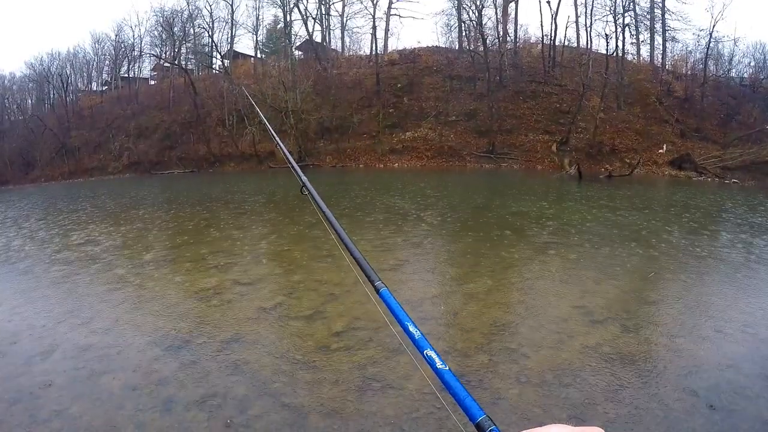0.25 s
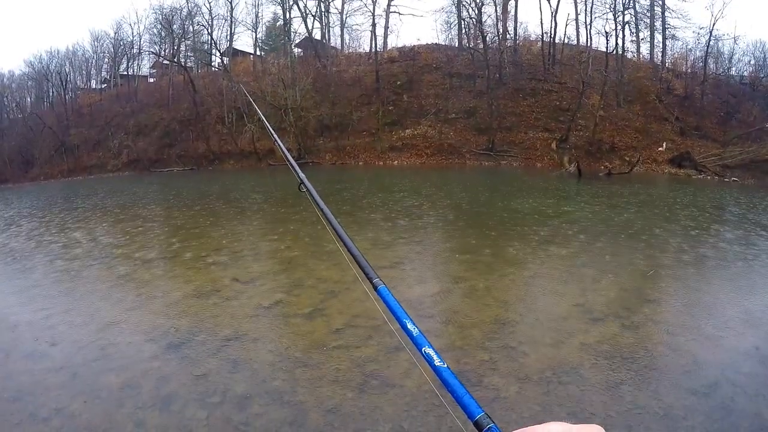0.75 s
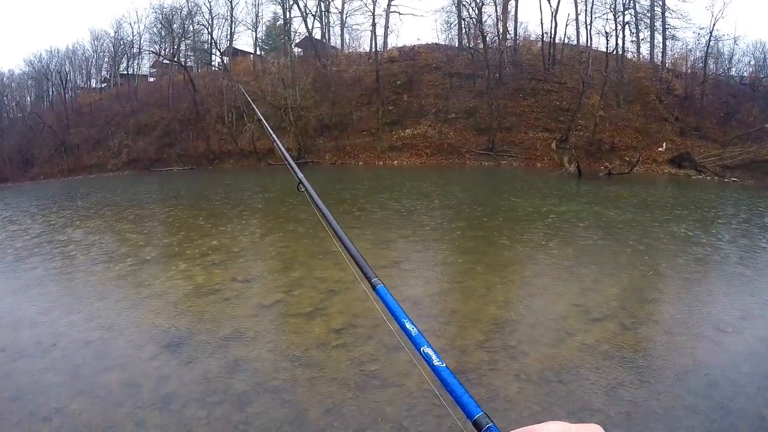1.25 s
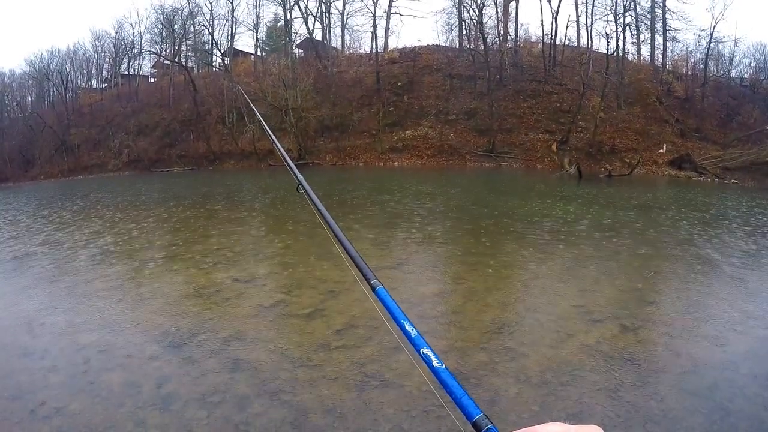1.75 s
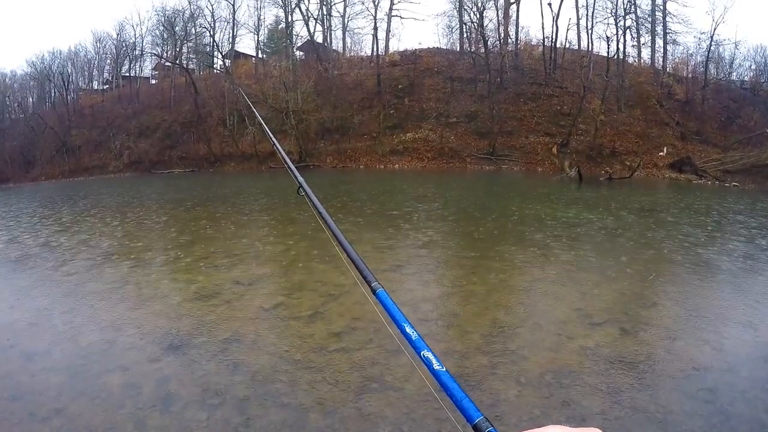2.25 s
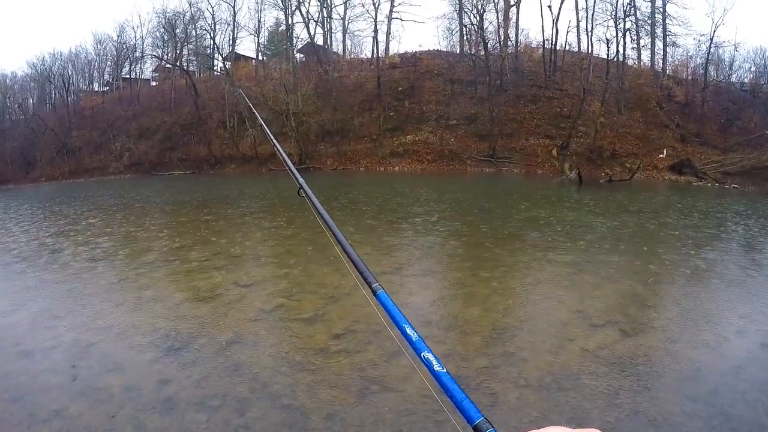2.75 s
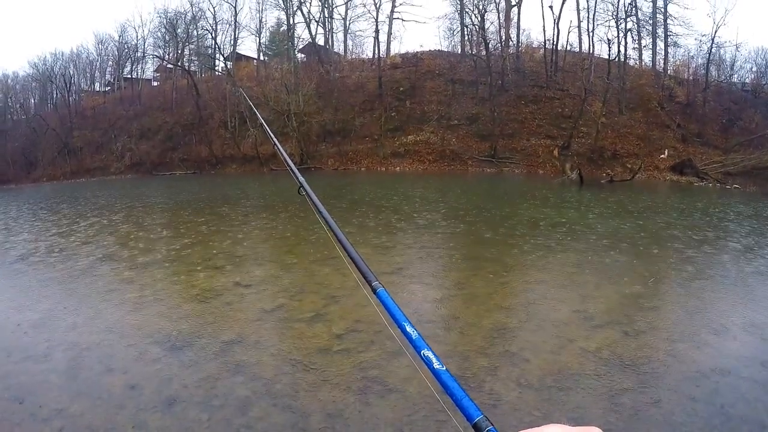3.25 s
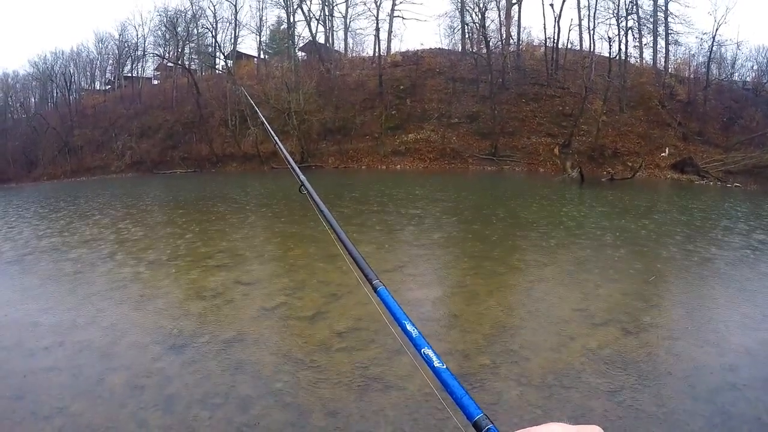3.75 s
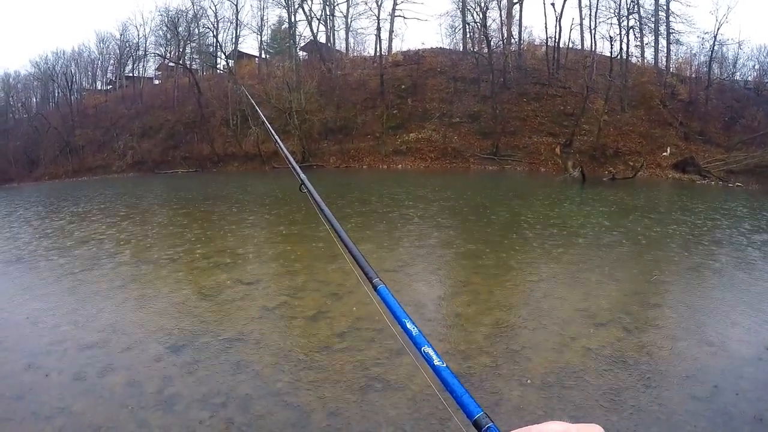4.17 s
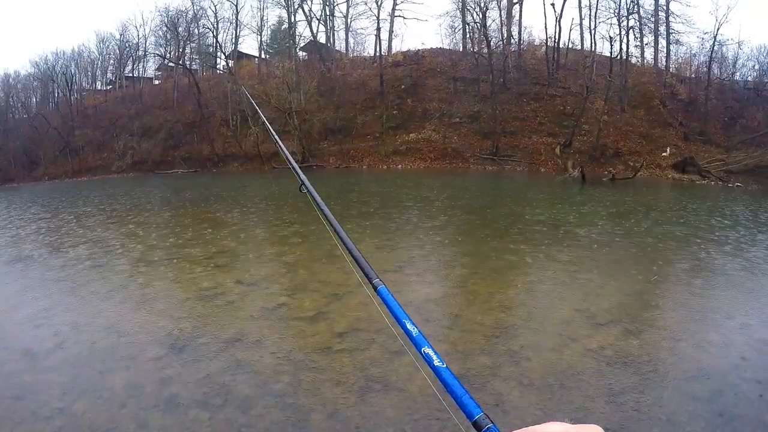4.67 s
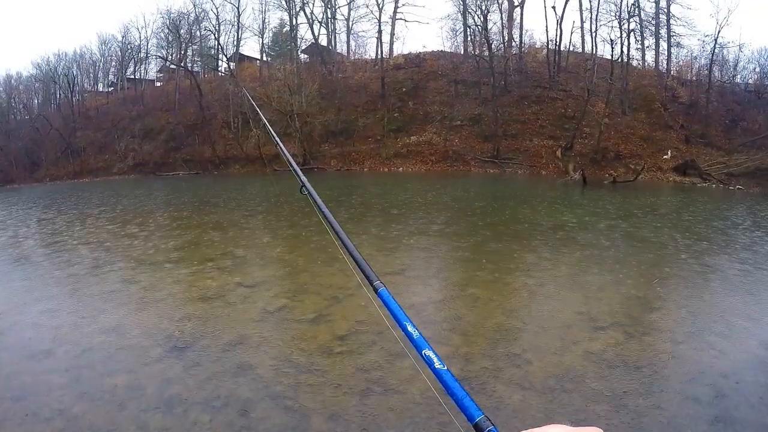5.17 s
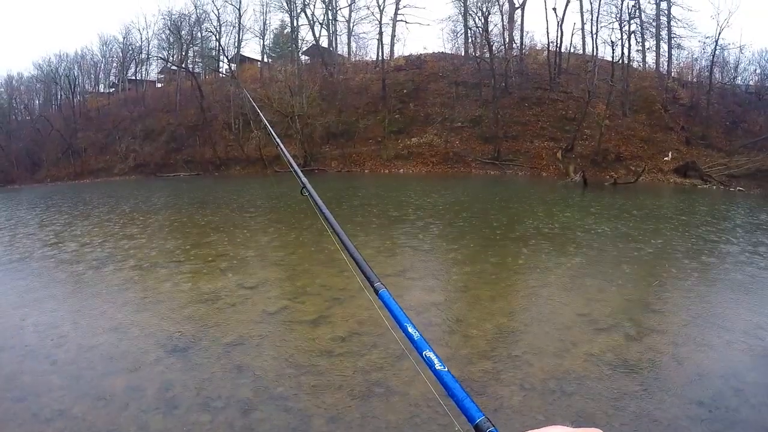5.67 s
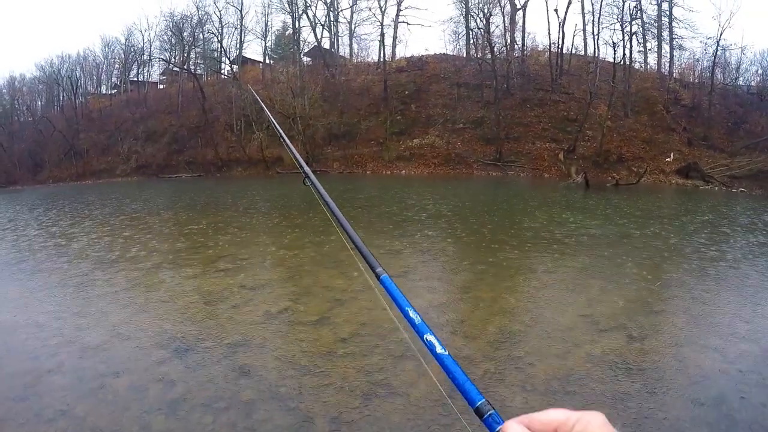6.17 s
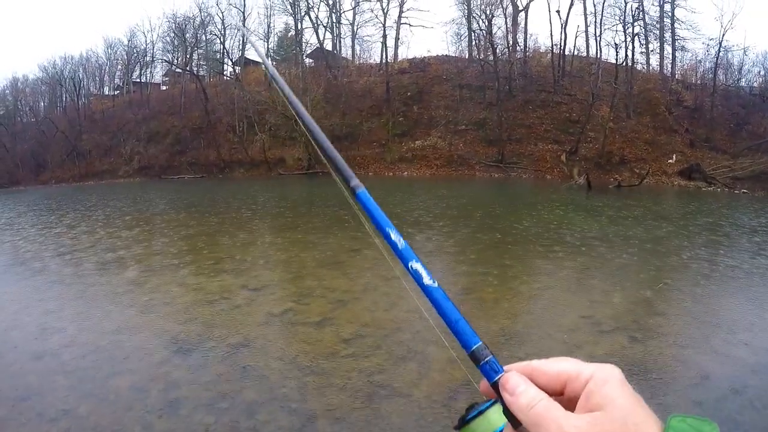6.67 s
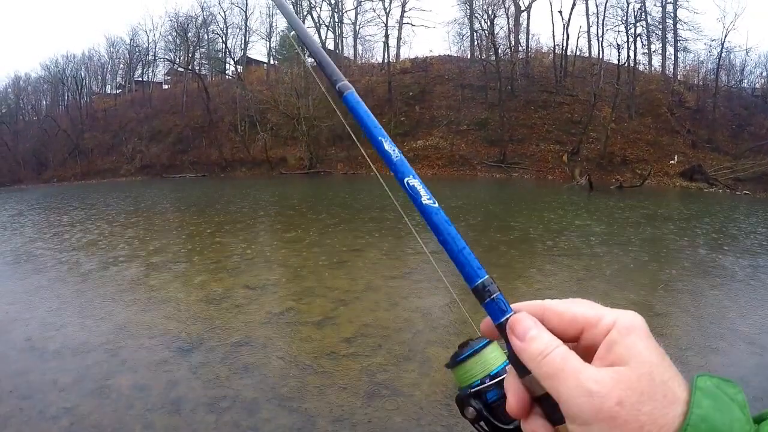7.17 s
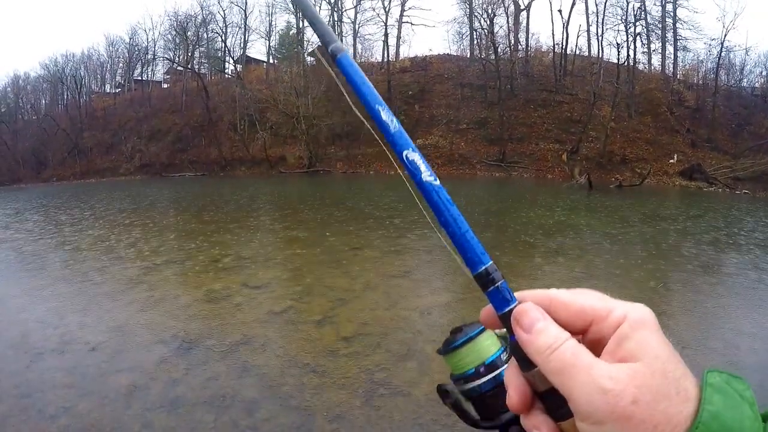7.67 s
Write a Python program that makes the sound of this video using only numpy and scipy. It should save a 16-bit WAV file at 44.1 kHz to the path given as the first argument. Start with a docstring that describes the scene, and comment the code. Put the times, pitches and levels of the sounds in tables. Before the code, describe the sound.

Steady rain falls on a river for about eight seconds, a quiet, even, finely grained hiss with a slightly hollow plastic colour, over a low, uneven rumble of light breeze. Fine spray patters faintly and tiny bubbles plip on the water, a clearer one at 0.1. Drops hit the microphone's case as very short, dry, ringing taps: a moderate one at 0.3, weaker ones at 0.6, 1.0 and 1.7, then a very loud crack at 1.8. After a calmer stretch come firm taps at 3.4 and 3.75, then a cluster from 4.1 to 4.5, with the hardest at 4.2. Clear plips sound at 3.1 and between 5.4 and 5.7; further taps at 5.8 and 6.1. A dull bump at 6.5 has softer knocks after it. The sharpest tap snaps at 6.9, the hiss dips and creeps back, a soft low bump follows at 7.3, and a final tap lands at 7.9.

```python
"""A river bank in steady rain, heard from a small camera worn by an angler.
The rain on the river is filtered noise: an even hiss with fine grains, coloured by the plastic case.
Drops tap the case and make its many pitches ring, with a faint shiver after the full drops.
Bubbles on the water close by plip as short rising tones, and lifting the rod bumps the camera softly.
Moving air adds a low, uneven rumble of filtered noise."""
import sys
import numpy as np
from scipy import signal
from scipy.fft import rfft, irfft
from scipy.io import wavfile

SR = 44100
rng = np.random.default_rng(int(sys.argv[2]) if len(sys.argv) > 2 else 0)


def to_wav(s):
    """Save 16-bit WAV."""
    ch = np.atleast_2d(s).T  # columns
    pcm = np.round(np.clip(ch, -1, 1) * 32767)  # PCM
    wavfile.write(sys.argv[1], SR, pcm.astype(np.int16))


N = 350154  # length in samples


def river_rain(far_db=-52.0, near_db=-57, near_per_s=900, swell_db=0.08):
    """Countless far drops merge into a hiss; nearer ones are single clicks that stand out as fine grains."""
    far = cavity(rng.standard_normal(N))
    clicks = rng.choice([-1, 1], N) * (rng.random(N) < near_per_s / SR)
    near = cavity(clicks)
    rain = amp(far_db) * unit(far) + amp(near_db) * unit(near)
    return rain * amp(swell_db * drift(1.6))


# The tone of rain on the water.
# Each row: pitch in Hz, relative strength in dB per Hz.
RAIN_TONE = [(100, -3), (300, 5), (550, 2), (900, 1), (1350, -2), (2500, 0), (3700, -3), (5200, -2),
             (6200, -5.5), (7700, -8.5), (9000, -8), (10800, -11.5), (12900, -8.5), (15200, -14)]
# Air inside the case that resonates before the microphone.
# Each row: pitch in Hz, distance in Hz at which the added power falls to a quarter,
# strength of the added sound in dB compared with the hiss.
CASE_AIR = [(1670, 210, 0.5), (2326, 204, 6.5), (2730, 410, 4), (3133, 145, 3.5), (4650, 380, -4),
            (9580, 280, 2)]


def cavity(x):
    """Gives a sound the rain's tone, then adds power where the air in the case resonates."""
    hz = np.fft.rfftfreq(N, 1 / SR)
    lift = 0
    for f, width, db in CASE_AIR:
        lift = lift + amp(db) ** 2 / (1 + ((hz - f) / width) ** 2) ** 2
    return irfft(rfft(x) * amp(read(RAIN_TONE, hz)) * np.sqrt(1 + lift), N)


SPOT_SPREAD = 0.18  # octaves around the favoured pitch that a light drop drives
HARD_SPREAD = 0.17  # harder drops drive more pitches: octaves added for a drop of 0 dB
COLLAPSE = -0.34  # a drop pulls back as it collapses, with this share of its impact

# Full drops on the case.
# Each row: start in seconds, peak level of the tap in dB before the shiver, pitch in Hz that the spot favours,
# strength of the broad splat in dB compared with the favoured pitch, top of the splat in Hz,
# seconds until the drop collapses.
FULL_DROPS = [(0.271, -17.5, 6000, 2.5, 2600, 0.0014), (0.587, -27.5, 5600, 1.5, 2000, 0.0006),
              (0.968, -31, 2700, -6, 2100, 0.00085), (1.689, -30, 5300, 1, 2550, 0.00059),
              (1.8329, 1, 2770, -9.5, 6660, 0.00075), (2.6144, -28, 2850, 6, 8200, 0.00073),
              (3.359, -14, 5900, -2, 7800, 0.000336), (3.7199, -30.5, 990, -1, 11000, 0.0015),
              (3.7539, -12, 2280, -9, 5530, 0.00074), (4.0722, -7.2, 2060, -9.5, 15000, 0.0014),
              (4.1602, -0.3, 2500, 7, 17000, 0.00027), (4.3292, -30, 1650, 12, 2300, 0.0017),
              (4.4657, -16, 3800, 8, 4500, 0.00069), (4.5156, -17.5, 1360, -7, 6000, 0.0011),
              (4.9675, -27.5, 2500, 9.5, 2150, 0.000884), (5.795, -13.5, 5300, -12.5, 14000, 0.00045),
              (6.0702, -17, 980, -3, 7200, 0.00024), (6.9076, 2, 3150, 0, 10400, 0.00021),
              (7.0972, -33, 2100, 2, 2900, 0.0008), (7.469, -26, 6600, -4, 6800, 0.00091),
              (7.6118, -28.5, 5130, -11, 5400, 0.00127), (7.9128, -15, 2340, 6, 13500, 0.00173)]


def big_drops(early_db=-25, early_t60=0.044, late_db=-28, late_t60=0.24,
              shiver_hz=2300, shiver_width_hz=900, size=6000):
    """Full drops tap the case, and each leaves a faint shiver of narrow, dying noise."""
    taps = np.zeros(N)
    for s, db, spot_hz, splat_db, top_hz, collapse_s in FULL_DROPS:
        spread = SPOT_SPREAD + HARD_SPREAD * amp(db)
        add(taps, s, amp(db) * tap(spot_hz, spread, splat_db, top_hz, collapse_s, COLLAPSE))
    # most of the shiver dies at once, a little lingers; t60 is the seconds to fall by 60 dB
    fall_db = 60 * np.arange(size) / SR
    early, late = amp(-fall_db / early_t60), amp(-fall_db / late_t60)
    fade = amp(early_db) * early / np.linalg.norm(early)
    fade = fade + amp(late_db) * late / np.linalg.norm(late)
    b, a = signal.iirpeak(shiver_hz, shiver_hz / shiver_width_hz, SR)
    shiver = signal.lfilter(b, a, rng.standard_normal(size) * fade)
    return taps + signal.oaconvolve(taps, shiver)[:N]


def small_drops(peak_db=-36, range_db=4, low_hz=1000, high_hz=3200,
                splat_db=-5, top_hz=3000, collapse_s=0.0011, count=5):
    """Now and then a small drop ticks on a random spot of the case: one in each equal stretch of time."""
    out = np.zeros(N)
    for k, (when, strength, spot) in enumerate(rng.random((count, 3))):
        spot_hz = low_hz * (high_hz / low_hz) ** spot
        tick = tap(spot_hz, SPOT_SPREAD, splat_db, top_hz, collapse_s, COLLAPSE)
        level_db = peak_db + range_db * (strength - 1.0)
        add(out, (k + when) / count * N / SR, amp(level_db) * tick)
    return out


def droplets(smallest_db=-48, per_s=40, size_db=3, spread=0.93, splat_db=-16, top_hz=5000, count=24):
    """Fine spray patters on many spots of the case, each spot with its own tap."""
    level_db = smallest_db + size_db * np.minimum(rng.exponential(1, N), 3)
    sizes = amp(level_db) * (rng.random(N) < per_s / SR)
    spots = rng.integers(0, count, N)
    # each spot's collapse: delay in seconds, then share of the impact (a push or a pull)
    collapses = rng.uniform([.0003, -.6], [.0015, .6], (count, 2))
    taps = []
    for hz, (delay_s, share) in zip(np.geomspace(1500, 3100, count), collapses):
        taps.append(tap(hz, spread, splat_db, top_hz, delay_s, share))
    out = np.zeros(N)
    for at in np.flatnonzero(sizes):
        add(out, at / SR, sizes[at] * taps[spots[at]])
    return out


# The pitches at which the case rings.
# Each row: pitch in Hz, seconds to fall by 60 dB, relative strength in dB.
CASE_RINGING = [(187.4, 0.025, -15.5), (616, 0.015, -13.5), (842, 0.011, -4), (1216, 0.0081, 3.85),
                (1758, 0.015, 4.5), (2164.5, 0.014, 2), (2450, 0.015, 2.65), (2877, 0.01333, 3),
                (3645, 0.013, 2.55), (4005, 0.013, -3), (4700, 0.0042, 0), (5520, 0.0085, -5.5),
                (6400, 0.0086, -5), (8000, 0.0077, -7.5), (8890, 0.011, -10), (10930, 0.0039, 1),
                (14100, 0.0024, 0)]


def tap(spot_hz, spread, splat_db, top_hz, collapse_s, collapse):
    """One drop on the case, peak 1: a broad splat, plus the pitches that move most at the spot it hits."""
    hz = np.transpose(CASE_RINGING)[0]
    drive = favoured(CASE_RINGING, spot_hz, spread) + amp(splat_db) * blow(hz, top_hz)
    # the drop collapses just after it lands: this second force feeds some pitches and stops others
    sound = ring(CASE_RINGING, drive) + collapse * ring(CASE_RINGING, drive, collapse_s)
    return sound / abs(sound).max()


def favoured(modes, spot_hz, spread):
    """How strongly a blow drives each pitch: most near the one its spot favours; spread is in octaves."""
    octaves_away = np.log2(np.transpose(modes)[0] / spot_hz)
    return np.exp(-.5 * (octaves_away / spread) ** 2)


def blow(hz, top_hz):
    """How strongly a splat drives each pitch: evenly at first, then fading above its top."""
    return 1 / (1 + (hz / top_hz) ** 4)


def ring(modes, drive, delay_s=0, size=2400):
    """Adds up dying tones of alternating sign, each driven by its own amount."""
    hz, t60, db = np.transpose(modes)[:, :, None]
    t = np.maximum(np.arange(size) / SR - delay_s, 0)
    fall_db = 60 * t / t60
    tones = amp(db - fall_db) * np.sin(2 * np.pi * hz * t)
    signs = (-1) ** np.arange(len(modes))
    return (drive * signs) @ tones


# Clear plips on the water close by.
# Each row: start in seconds, level in dB at which the bubble begins to die away, bubble pitch in Hz.
CLEAR_PLIPS = [(0.0647, -34, 1953), (3.1401, -32, 2320), (4.195, -40, 1010), (5.4182, -37.5, 1020),
               (5.637, -36, 1850), (5.7383, -34.5, 2310), (6.8665, -40, 1060)]


def plops(faintest_db=-54, size_db=3.0, low_hz=750, high_hz=3200, count=90):
    """Drops on the nearby water trap small bubbles: many faint ones, and a few clear plips close by."""
    out = np.zeros(N)
    for when, pitch, chance in rng.random((count, 3)):
        # small bubbles are common, loud ones rare
        level_db = faintest_db + size_db * min(-np.log(1 - chance), 3)
        add(out, when * N / SR, amp(level_db) * bubble(low_hz * (high_hz / low_hz) ** pitch))
    for s, db, hz in CLEAR_PLIPS:
        add(out, s, amp(db) * bubble(hz))
    return out


BUBBLE_CYCLES = 3.9  # cycles at the starting pitch until the bubble dies to 1/e
BUBBLE_RISE = 0.038  # share by which the count of cycles has grown after that time


def bubble(hz, size=3000):
    """A trapped bubble rings briefly and rises in pitch, until its faint end settles on a steady pitch."""
    turns = hz * np.arange(size) / SR
    age = turns / BUBBLE_CYCLES
    raised_turns = turns * (1 + BUBBLE_RISE * np.minimum(age, 2))
    return np.exp(-age) * np.sin(2 * np.pi * raised_turns)


# Soft bumps through the camera's mount.
# Each row: start in seconds, peak level in dB, pitch in Hz that the bump favours, spread of that in octaves.
SOFT_BUMPS = [(4.285, -39.5, 425, 0.78), (6.4925, -23.5, 450, 1.9), (6.575, -39, 240, 0.9),
              (7.31, -34, 152, 0.53)]
# The pitches at which the mount rings.
# Each row: pitch in Hz, seconds to fall by 60 dB, relative strength in dB.
MOUNT_RINGING = [(126, 0.051, 5.5), (193, 0.018, 6), (303.5, 0.016, -6), (436, 0.038, -19),
                 (583, 0.054, -9.5), (816, 0.053, -10.5), (1150, 0.02, 1.5), (1237, 0.0152, 0.5),
                 (1760, .02, -11)]


def bumps():
    """Dull knocks make the mount ring as the angler moves."""
    out = np.zeros(N)
    for s, db, spot_hz, spread in SOFT_BUMPS:
        knock = ring(MOUNT_RINGING, favoured(MOUNT_RINGING, spot_hz, spread))
        add(out, s, amp(db) * knock / abs(knock).max())
    return out


# The tone of moving air.
# Each row: pitch in Hz, relative strength in dB per Hz.
AIR_TONE = [(5, -7.5), (16, -0.5), (32, -1.5), (47, -8.5), (62, -8.5), (78, -12.5), (100, -15.5),
            (150, -20), (210, -25), (400, -37), (1200, -62)]


def air(level_db=-44.0, gust_db=2.0, gust_hz=3):
    """A light breeze rumbles at the microphone: low noise whose level wanders."""
    hz = np.fft.rfftfreq(N, 1 / SR)
    rumble = irfft(rfft(rng.standard_normal(N)) * amp(read(AIR_TONE, hz)), N)
    return amp(level_db) * unit(rumble * amp(gust_db * drift(gust_hz)))


def amp(db):
    """Turns decibels into a gain."""
    return 10 ** (np.asarray(db) / 20)


def unit(x):
    """Scales a sound to an rms (average strength) of 1."""
    return x / np.sqrt(np.mean(x ** 2) + 1e-20)


def read(points, hz):
    """Reads a tone table, joining its points by straight lines over log pitch."""
    f, db = np.transpose(points)
    return np.interp(np.log(hz + 1), np.log(f), db)


def add(mix, s, sound):
    """Mixes a sound in at s seconds."""
    part = mix[max(round(s * SR), 0):][:len(sound)]
    part += sound[:len(part)]


def drift(rate_hz):
    """A slow random curve of rms 1: noise that fades out above the given rate."""
    hz = np.fft.rfftfreq(N, 1 / SR)
    slow = (hz > 0) / (1 + (hz / rate_hz) ** 4)
    return unit(irfft(rfft(rng.standard_normal(N)) * slow, N))


def scene():
    """Adds rain, drops, bubbles, bumps and breeze in one channel."""
    rain_and_drops = river_rain() + big_drops() + small_drops() + droplets()
    return (rain_and_drops + plops() + bumps() + air())[None]


EDGE_HZ = 15400  # where the treble ends

# The level of everything: it starts slightly low, and later dips and creeps back.
# Each row: time in seconds, gain in dB.
OVERALL_LEVEL = [(0, -1.8), (.6, 0), (6.9, 0), (6.925, -5.3), (7.3, -2.5), (7.65, -2), (7.94, 0.7)]


def record(dry):
    """The level follows its curve, the hardest taps clip, and the treble ends steeply."""
    gain_db = np.interp(np.arange(N) / SR, *np.transpose(OVERALL_LEVEL))
    clipped = np.clip(dry * amp(gain_db), -1, 1)
    low_pass = signal.firwin(401, EDGE_HZ, window=("kaiser", 8), fs=SR)
    return signal.oaconvolve(clipped, low_pass[None], "same")


dry = scene()
out = record(dry)
to_wav(out)
```